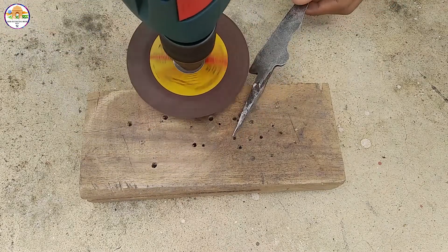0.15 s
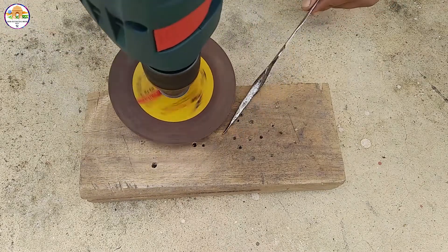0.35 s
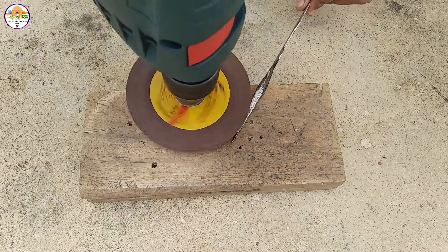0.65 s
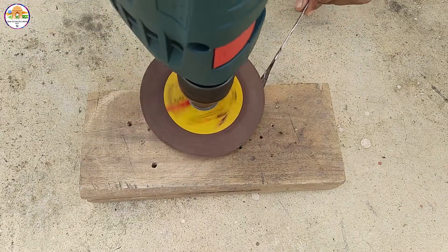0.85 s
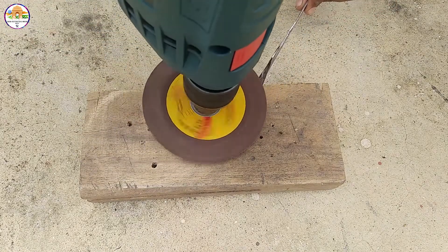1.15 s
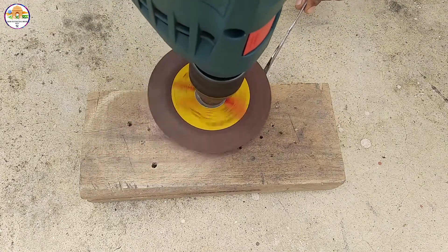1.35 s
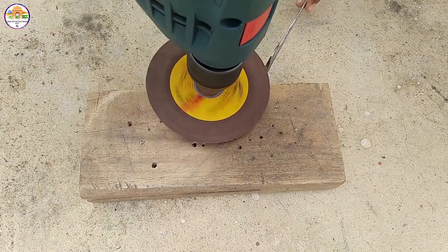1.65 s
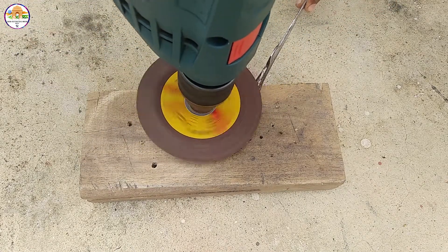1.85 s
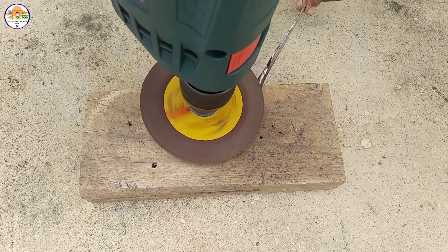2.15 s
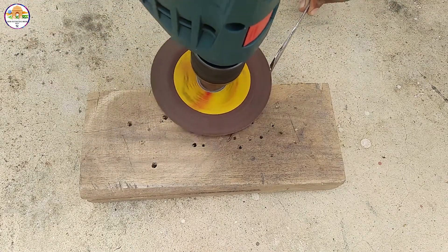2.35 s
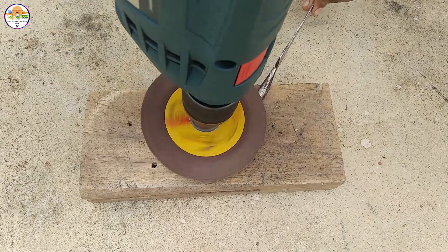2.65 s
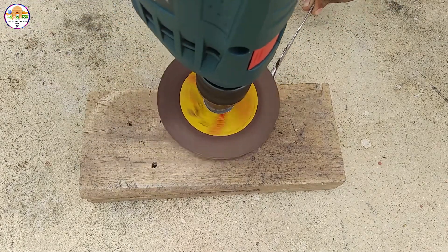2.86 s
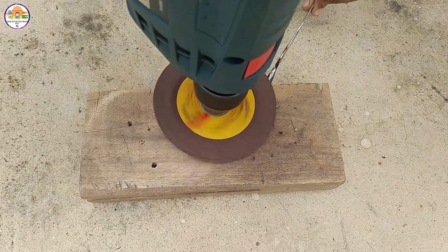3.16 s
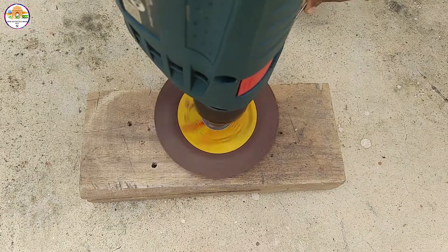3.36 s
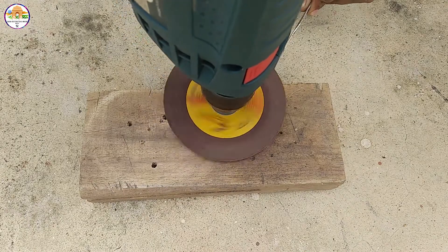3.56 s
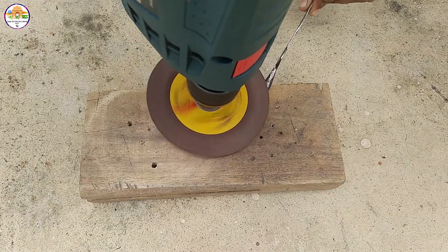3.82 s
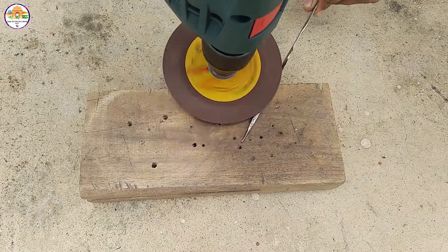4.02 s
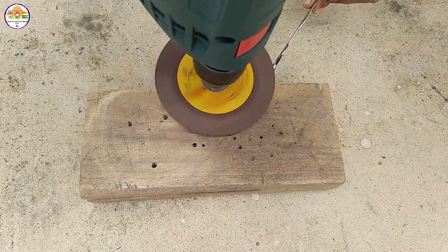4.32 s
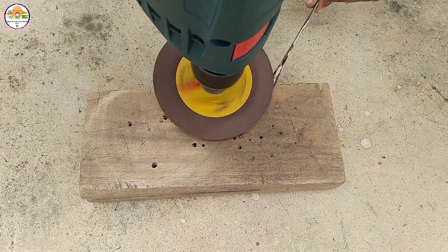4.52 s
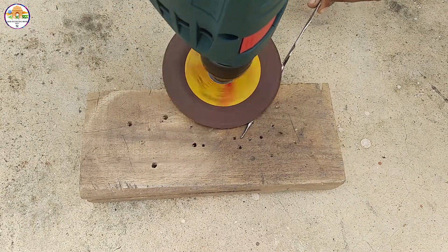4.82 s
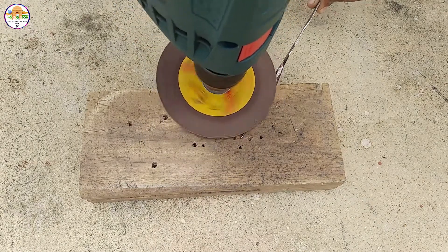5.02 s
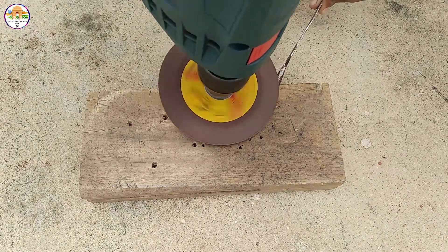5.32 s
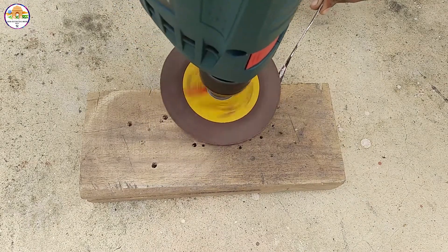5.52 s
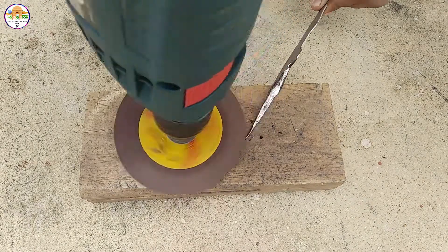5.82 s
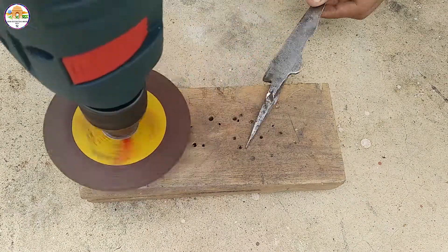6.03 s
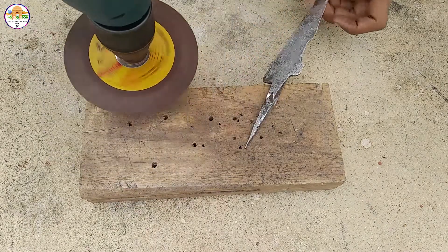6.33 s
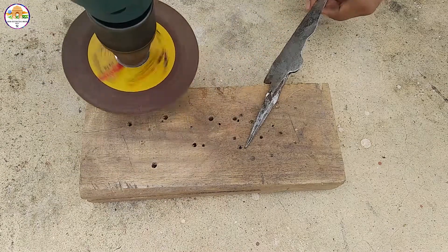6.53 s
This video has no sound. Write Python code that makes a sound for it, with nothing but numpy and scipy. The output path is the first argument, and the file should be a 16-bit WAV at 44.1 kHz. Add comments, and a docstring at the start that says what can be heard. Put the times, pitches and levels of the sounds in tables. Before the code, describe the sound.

Close, harsh disc grinding on a steel blade, a pause as the drill motor coasts down with soft thumps, then it revs up and scrapes again.

```python
"""Hand drill grinding a blade

A hand drill spins an abrasive disc against a steel blade, close to a pair of microphones. Each stroke makes
the blade ring in its bending modes (noise through resonances) over a gritty hiss (shaped noise). The trigger
is let go once: the motor's whine (a blurred tone), roar and air noise fall and climb again with its speed.
A few soft low thumps sound in the lull, over a faint low rumble."""
import sys
import numpy as np
from scipy import signal
from scipy.fft import rfft, irfft, next_fast_len
from scipy.io import wavfile
from scipy.ndimage import uniform_filter1d, map_coordinates

SR = 44100
rng = np.random.default_rng(int(sys.argv[2]) if len(sys.argv) > 2 else 0)


def wav_out(sig):
    """Save sig, one row per channel (or a flat mono array), as 16-bit PCM at SR to the path in sys.argv[1]."""
    wavfile.write(sys.argv[1], SR, np.round(np.clip(np.atleast_2d(sig).T, -1, 1) * 32767).astype(np.int16))


N = 294576
TIME = np.arange(N) / SR  # seconds

# Strokes of the disc along the blade. Each row: start in seconds, length in seconds, final blade ring in dB,
# its rise over the stroke in dB, first edge ring in dB, its fade in dB, first grit hiss in dB.
# A negative rise or fade goes the other way.
STROKES = [(-.01, 0.31, -18.5, 13.5, -18.5, 1, -20), (0.314, 0.18, -30.5, -10.5, -21, 9, -29),
           (0.485, 0.31, -22.5, 12, -18.5, 4, -22), (0.803, 0.041, -36.5, -14, -22.5, 0, -28),
           (0.853, 0.22, -21.5, 8.5, -20.5, -2, -26.5), (1.558, 0.34, -16.5, 9.5, -19.5, 6, -20),
           (1.973, 0.2, -24.5, 0, -18.5, 7.5, -21), (2.156, 0.063, -15.5, 9.5, -22.5, 4, -18.5),
           (2.24, 0.11, -17.5, -2.5, -20.5, 30, -26.5), (2.355, 0.14, -18.5, 1, -20, -3, -25.5),
           (2.493, 0.23, -17.5, -2.5, -26.5, 12, -24), (2.725, 0.14, -17.5, 2.5, -22.5, 3, -24),
           (2.867, .2, -17, -1.5, -25, 18, -21), (3.077, 0.16, -16.5, 7, -23.5, 3, -24),
           (3.247, .15, -16, 4.5, -21.5, 5, -21.5), (3.393, 0.12, -16.5, 10.5, -26.5, 5, -19.5),
           (5.3, 0.075, -31.5, 2, -40, -10, -35), (5.374, 0.065, -14, 6, -27, 0, -17.5),
           (5.486, 0.082, -18, -0.5, -37, 14, -16.5), (5.584, 0.088, -20.5, -5.5, -36.5, -15, -17.5),
           (5.679, 0.22, -19.5, 1.5, -21, 12, -16.5), (5.894, 0.23, -16, 3.5, -22.5, -0.5, -24.5),
           (6.13, .13, -17.5, 10.5, -26.5, -3.5, -21), (6.29, 0.2, -23, -4.5, -24.5, 8, -16.5),
           (6.498, 0.076, -26, -5, -24, 18, -17), (6.589, 0.15, -22, 5, -34, 3, -20)]
# Main bending modes of the blade. Each row: centre in Hz, width in Hz, relative level in dB before sharpening.
BLADE_MODES = [(1576, 53, -8.5), (1829, 97, 0), (1938.4, 71.5, 4)]
# Lower bending modes of the blade. Each row: centre in Hz, width in Hz, relative level in dB before sharpening.
LOW_BLADE_MODES = [(657, 26, -13.5), (945, 12, -17), (1224, 55, -7.5)]
# The main ring shifts as the disc travels along the blade, in three runs.
# Each row: time in seconds, ring in Hz (its ratio to 1900 Hz sets the tuning, up to 4 % either way).
RING_PITCH = [
    [(0.0, 1910), (0.066, 1780), (0.228, 1908), (0.532, 1850), (0.572, 1800), (0.628, 1910), (1.1, 1840)],
    [(1.57, 1810), (1.646, 1907), (2.356, 1913), (2.458, 1850), (2.618, 1922), (3.53, 1902)],
    [(5.37, 1875), (5.832, 1900), (5.966, 1842), (6.084, 1908), (6.68, 1906)],
]
# The lower ring shifts in its own way.
# Each row: time in seconds, ring in Hz (its ratio to 1215 Hz sets the tuning, up to 4 % either way).
LOW_RING_PITCH = [(0, 1185), (1.9, 1203), (2.3, 1245), (2.5, 1163), (2.75, 1213), (3.0, 1258), (3.5, 1265),
                  (5.4, 1226), (6.05, 1160), (6.68, 1220)]
# Ringing modes of the blade's edge. Each row: centre in Hz, width in Hz, relative level in dB.
EDGE_MODES = [(4310, 29, -9), (5160, 90, 1.5), (5530, 67, 5.5), (5730, 57, 9.5), (5905, 62, 5.5),
              (6000, 85, 6.5), (6200, 127, 6), (7470, 400, 0.5), (9350, 110, -6), (13000, 310, 0.5)]
# The edge's lower modes come and go against its upper ones as the disc travels.
# Each row: time in seconds, change of the lower modes in dB.
EDGE_BALANCE = [(0, 2), (.45, 3), (.8, 2), (1.1, 3), (1.6, 1.5), (1.8, -3), (2.15, 1), (2.4, -2), (2.8, -4),
                (3.2, -7), (3.5, -14), (5.4, -3), (5.7, 3), (6.0, 2.5), (6.3, 1.5), (6.68, 7)]
# Colour of the grit hiss. Each row: frequency in Hz, relative dB per Hz.
GRIT_COLOUR = [(1350, -38), (2300, 3), (2470, -5), (2700, -7), (3080, -7.5), (3400, -4), (4150, -5),
               (4320, -1), (4680, -6.5), (5000, -3), (5200, -2), (6080, -3), (7560, -0.5), (9240, -1.5),
               (12200, 2), (15700, -5.5)]
# Colour of the roar of gears and housing. Each row: frequency in Hz, relative dB per Hz.
HOUSING_COLOUR = [(24, -76), (40, -70), (166, -20.5), (231, -26), (367, -15), (420, -14), (629, -7),
                  (780, -7.5), (1000, 0), (1600, 2), (1850, -10), (2400, -16.5), (2560, -11.5), (3050, -7),
                  (3300, -1), (3750, -2.5), (4150, -22), (4600, -10.5), (5250, -3.5), (5750, -10.5),
                  (6500, -4.5), (7700, -18), (9000, -15), (15700, -15)]
# Colour of the cooling air. Each row: frequency in Hz, relative dB per Hz.
AIR_COLOUR = [(1470, -36), (1980, 2.5), (2200, -8), (2600, -4), (3050, -9.5), (3500, -11), (3900, -8),
              (4350, -5.5), (4650, -13), (4820, -2), (5030, -25), (5400, -1), (5620, -12), (5900, -5),
              (6780, -5.5), (7200, -6.5), (9310, 1), (10100, -0.5), (12600, 1), (15700, -6)]
# How the housing lets the rotor's low tone out. Each row: frequency in Hz, coasting level in dB.
UNBALANCE_LEVEL = [(155, -69), (210, -65), (285, -54), (385, -50), (425, -47.5), (445, -64.5), (475, -73)]
# How the housing lets the whine out. Each row: frequency in Hz, coasting level in dB.
WHINE_LEVEL = [(6000, -48), (6900, -43), (7700, -39.5), (7950, -51), (8300, -48), (8420, -27), (8950, -38),
               (9470, -22.5), (9950, -27), (10700, -28), (11600, -18.5), (12300, -24), (13300, -21),
               (14400, -28), (15100, -23), (16000, -29), (17400, -51)]
# The trigger is squeezed again. Each row: time in seconds, whine pitch in Hz.
SPIN_UP = [(5.05, 5900), (5.15, 7280), (5.2, 8130), (5.3, 9280), (5.36, 10600), (5.45, 12200), (5.5, 13500),
           (5.55, 14250), (5.62, 15300), (5.7, 15980), (6.0, 16360), (6.68, 17330)]
# Where the drill is held. Each row: time in seconds, left-minus-right level in dB with no firm contact.
DRILL_SIDE = [(0, 3), (0.7, -2.5), (1.1, -6), (3.5, -10), (4.05, -9.5), (4.4, -6.5), (5.0, -5), (5.4, -1.5),
              (6.68, 0)]
# Soft low thumps. Each row: time in seconds, peak in dB, pitch in Hz, time from peak to 1/e in seconds.
THUMPS = [(4.5, -42, 168, .008), (4.568, -41, 176, 0.014), (4.592, -40, 188, 0.0043),
          (4.646, -43, 188, 0.0051), (4.708, -33, 254, 0.0035), (4.725, -38.5, 161, 0.015),
          (4.78, -45, 210, 0.016), (4.858, -31, 233, 0.0028)]
# Colour of the low rumble. Each row: frequency in Hz, relative dB per Hz.
RUMBLE_COLOUR = [(18, -69), (30, -39), (75, -35), (110, -10), (177, -7), (400, -11.5), (520, -47),
                 (880, -120)]
# Narrow dips in the drill and grinding sound. Each row: centre in Hz, half width in Hz, depth from 0 to 1.
DIPS = [(2420, 30, 0.54), (3063, 29, 0.86), (4250, 35, 0.5), (4720, 39, 0.44), (4910, 40, 0.74)]
# How alike left and right are. Each row: frequency in Hz, likeness from 0 to 1.
ALIKE = [(30, .95), (100, 1), (300, 1), (1500, 1), (4800, 1), (5700, 0.86), (7500, 0.27), (10000, 0.58),
         (12000, 0.3), (15000, 0.1)]

TOUCH_S, LIFT_S, GRIT_LIFT_S = 0.015, 0.02, 0.055  # time to touch down; to lift off (rings, grit)
GRIT_FADE_DB = 4.5  # over a stroke
EDGE_HOLDS = 2.3  # power of the stroke's progress: the edge ring holds before it changes
EDGE_SPLIT = 4  # how many edge modes count as lower
# one extra scrape near the end of the second run of strokes
BITE_S, BITE_LENGTH_S, BITE_DB, BITE_HZ, BITE_WIDTH_HZ = 3.36, 0.11, -30, 4100, 660

WHINE_ORDER, COMMUTATOR_ORDER = 38.5, 24  # cycles for each turn of the rotor
COMMUTATOR_DB = -63
GEARING = 11  # rotor turns for each turn of the disc
# rotor speed, counted as its whine's pitch: steady, then coasting against air drag and bearing friction
RUNNING_HZ, RELEASE_S, COAST_S, FRICTION_HZ = 17400, 3.51, 2.12, 4800
POWERED_DB, UNBALANCE_POWERED_DB = 4, -3.5  # change under power: whine, low rotor tone
# noise level at running speed before the loss to the side, and the drop from there to standstill
ROAR_DB, ROAR_DROP_DB = -30.5, 14.5
AIR_DB, AIR_DROP_DB = -20.5, 36
AIR_BODY_HZ, AIR_BODY_DROP_DB = 2670, 47  # top of the air's lower band; its further drop in coasting
# noise regained at standstill while the motor pulls up to speed: air, gears, the air's lower band
STRAIN_DB, ROAR_STRAIN_DB, BODY_STRAIN_DB = 7.5, 8, 16.5
ASIDE_LOSS = 0.075  # dB of drill noise lost for each dB that it is held to the side
CENTRED = 0.87  # share by which a firm contact draws the drill's noise to the middle
FIRM_DB = -24.5  # grit level of a firm contact
RUMBLE_DB, RUMBLE_HELD_DB = -59.5, 12.5  # level; damping while the disc presses on the blade
TOP_HZ = 15760  # band limit


def grinding(ring, edge, grit):
    """Grit scrapes the steel, harder once each turn of the untrue disc; the blade's modes ring with it."""
    disc_turns = rotor_turns() / GEARING
    runout_db = 1.53 * np.sin(2 * np.pi * disc_turns + 1.17 * wobble(3.5)) + 0.91 * wobble(25)
    scrape = patchy(patchy_db=3.0) * amp(runout_db + 1.1 * wobble(300))
    push = rng.standard_normal((2, N)) * ring * amp(0.98 * runout_db + 1.63 * wobble(45))
    blade_sound = unit(blade_ring(push)) * np.sqrt(np.mean(ring ** 2))
    edge_sound = edge_ring(scrape) * edge
    grit_sound = unit(filtered(scrape, colour(GRIT_COLOUR))) * grit
    return ports(blade_sound + edge_sound + grit_sound + bite(scrape), pan_db=0)


def strokes():
    """Gains of blade ring, edge ring and grit: each contact touches down, changes along the way and lifts."""
    gains = np.zeros((3, N))
    lift = np.array([[LIFT_S], [LIFT_S], [GRIT_LIFT_S]])
    for start, length, ring_db, swell_db, edge_db, fade_db, grit_db in STROKES:
        first = max(0, int(start * SR))
        last = min(N, int((start + length + GRIT_LIFT_S + LIFT_S) * SR))
        t = np.arange(first, last) / SR - start
        done = np.clip(t / length, 0, 1)
        on = np.clip(np.minimum(t / TOUCH_S, 1 + (length - t) / lift), 0, 1)
        ring_now = ring_db - swell_db * (1 - done)
        edge_now = edge_db - fade_db * done ** EDGE_HOLDS
        grit_now = grit_db - GRIT_FADE_DB * done
        gains[:, first:last] += on * amp([ring_now, edge_now, grit_now])
    return gains


def blade_ring(push):
    """The blade's two groups of modes, each cross-faded between a low, a middle and a high tuning."""
    step = 0.04  # from one tuning to the next, as a share of the pitch
    main_shift = curves(np.vstack(RING_PITCH))[0] / 1900
    low_shift = curves(LOW_RING_PITCH)[0] / 1215
    ring = 0
    for table, shift in ((BLADE_MODES, main_shift), (LOW_BLADE_MODES, low_shift)):
        position = np.clip((shift - 1) / step, -1, 1)
        for place in (-1, 0, 1):
            share = np.clip(1 - np.abs(position - place), 0, 1)

            def tuned(hz):
                response = modes(table)(hz / (1 + place * step))
                return response * np.abs(response) ** 0.41  # sharpen the peaks

            ring = ring + filtered(push * share, tuned)
    return ring


def edge_ring(scrape):
    """The edge's modes, each coming and going on its own, in two groups of shifting balance."""
    def each_mode(hz):
        return np.array([[(-1) ** k * modes([row])(hz)] for k, row in enumerate(EDGE_MODES)])

    rings = filtered(scrape, each_mode)
    levels_db = np.array([3.15 * wobble(9) for row in EDGE_MODES])
    levels_db[:EDGE_SPLIT] += curves(EDGE_BALANCE)[0]
    return unit(np.sum(rings * amp(levels_db)[:, None], axis=0))


def bite(scrape):
    """A short extra scrape: one band of the scraping noise swells and fades."""
    done = np.clip((TIME - BITE_S) / BITE_LENGTH_S, 0, 1)
    band = unit(filtered(scrape, lambda hz: np.exp(-((hz - BITE_HZ) / BITE_WIDTH_HZ) ** 4)))
    return band * amp(BITE_DB) * np.sqrt(np.abs(np.sin(np.pi * done)))


def drill(grit):
    """Gear and housing roar, cooling air and the rotor's unbalance as a low tone; all follow its speed."""
    hz = speed()
    slowed = 1 - np.minimum(hz / RUNNING_HZ, 1)
    coasting = np.gradient(hz) < 0
    pan_db = curves(DRILL_SIDE)[0] * (1 - CENTRED * firmness(grit))

    roar_drop_db = (ROAR_DROP_DB - ROAR_STRAIN_DB * ~coasting) * slowed
    roar = unit(filtered(patchy(patchy_db=3.5), colour(HOUSING_COLOUR)))
    roar = roar * amp(ROAR_DB - roar_drop_db + 0.087 * wobble(27))
    noise = (roar + cooling_air(slowed, coasting)) * amp(-ASIDE_LOSS * np.abs(pan_db))

    level_db = 2.5 * wobble(14) + UNBALANCE_POWERED_DB * ~coasting
    turning = np.sin(2 * np.pi * rotor_turns() + 0.5 * wobble(30))
    unbalance = colour(UNBALANCE_LEVEL)(hz / WHINE_ORDER) * amp(level_db) * turning
    return ports(noise, pan_db, spread=0.037) + unbalance * amp([[-1.5], [1.5]])


def cooling_air(slowed, coasting):
    """Air hiss in two bands; the lower one falls away faster as the rotor coasts down."""
    def two_bands(hz):
        low = 1 / (1 + (hz / AIR_BODY_HZ) ** 8)
        return colour(AIR_COLOUR)(hz) * np.array([[low], [1 - low]])

    body, hiss = filtered(patchy(patchy_db=4.0), two_bands)
    body_gain = amp(np.where(coasting, -AIR_BODY_DROP_DB, BODY_STRAIN_DB) * slowed)
    drop_db = (AIR_DROP_DB - STRAIN_DB * ~coasting) * slowed
    air = (body * body_gain + hiss) / np.std(body + hiss)
    return air * amp(AIR_DB - drop_db + 1.36 * wobble(55))


def whine():
    """A high rotor order, blurred by uneven contacts and throbbing once each turn of the disc."""
    hz = speed()
    coasting = np.gradient(hz) < 0
    phase = 2 * np.pi * WHINE_ORDER * rotor_turns()

    def blur(rate):
        return np.array([wobble(rate) + 1j * wobble(rate) + 1.0 for port in "LR"])

    throb = amp(4.1 * np.cos(2 * np.pi * (rotor_turns() / GEARING + 0.25)))
    blurred = np.where(coasting, blur(190), blur(700)) * np.exp(1j * phase)
    tone = unit(throb * np.real(blurred))
    octave_on = coasting * (hz < SR / 5) * (hz > 6500)
    octave = amp(-51) * octave_on * np.real(blur(300) * np.exp(2j * phase))
    lower_phase = phase * COMMUTATOR_ORDER / WHINE_ORDER
    lower = amp(COMMUTATOR_DB) * coasting * np.real(blur(120) * np.exp(1j * lower_phase))

    level = colour(WHINE_LEVEL)(hz)
    # under power the pitch sweeps too fast to show the housing's dips
    smooth_level = amp(POWERED_DB) * uniform_filter1d(level, size=SR // 12)
    level = np.where(coasting, level, smooth_level)
    pan = amp(np.array([[.5], [-.5]]) * 1.03 * curves(DRILL_SIDE)[0])
    return (level * tone + octave + lower) * pan


def speed():
    """Rotor speed as whine pitch in Hz: drag and friction slow it after release, then power lifts it."""
    since_release = np.maximum(TIME - RELEASE_S, 0)
    coasting = (RUNNING_HZ + FRICTION_HZ) * np.exp(-since_release / COAST_S) - FRICTION_HZ
    return np.where(TIME < SPIN_UP[0][0], coasting, curves(SPIN_UP)[0])


def rotor_turns():
    """Turns of the rotor so far: its speed added up over time."""
    return np.cumsum(speed()) / WHINE_ORDER / SR


def thumps():
    """Soft low pushes: short low tones that swell and die away smoothly."""
    out = np.zeros(N)
    for start, db, hz, length in THUMPS:
        t = TIME - start
        out += amp(db) * np.cos(2 * np.pi * hz * t) * np.exp(-(t / length) ** 2)
    return out * amp([[-1.5], [1.5]])


def rumble(grit):
    """A faint low rumble of shaped noise, weaker while the disc is pressed on the blade."""
    level = amp(RUMBLE_DB - RUMBLE_HELD_DB * firmness(grit) + 1.9 * wobble(9))
    noise = unit(filtered(patchy(patchy_db=4.0), colour(RUMBLE_COLOUR)))
    return ports(noise * level, pan_db=-6.0, spread=0.05)


def firmness(grit):
    """How firmly the disc presses on the blade, from 0 to 1, judged by the grit gain."""
    return np.clip(grit / amp(FIRM_DB), 0, 1)


def dips(hz):
    """The gain left by the narrow dips."""
    return np.prod([1 - depth / (1 + ((hz - c) / w) ** 2) for c, w, depth in DIPS], axis=0)


def ports(pair, pan_db, spread=0):
    """Two noises to left and right: most alike in the bass, less in the treble and when off to one side."""
    f, alike = np.transpose(ALIKE)

    def mid_side(hz):
        likeness = np.clip(np.interp(np.log(hz + 1), np.log(f), alike), 0, 1)
        turn = np.arccos(likeness) / 2
        return np.array([np.cos(turn), np.sin(turn)])

    mid, side = filtered(pair, mid_side)
    side = side + spread * np.abs(pan_db) * pair[1]
    return np.array([mid + side, mid - side]) * amp(np.array([[.5], [-.5]]) * pan_db)


def patchy(patchy_db):
    """Two noises whose strength varies in patches of time and frequency."""
    z = signal.stft(rng.standard_normal((2, N)), nperseg=512)[2]
    field = uniform_filter1d(rng.standard_normal(z.shape[1:]), 3, 0)  # smooth over frequency
    field = uniform_filter1d(field, 12, 1)  # smooth over time
    return signal.istft(z * amp(patchy_db * unit(field)), nperseg=512)[1][:, :N]


def modes(table):
    """The response of a set of resonances, with alternating signs."""
    def response(f):
        total = 0
        for k, (centre, width, db) in enumerate(table):
            damping = 1j * f * width
            total = total + (-1) ** k * amp(db) * damping / (centre * centre - f * f + damping)
        return total
    return response


def colour(points):
    """The gain of (Hz, dB) points read on a log axis."""
    f, db = np.transpose(points)
    return lambda hz: amp(np.interp(np.log(hz + 1), np.log(f + 1), db))


def filtered(x, response):
    """x times a complex response of frequency."""
    m = next_fast_len(N + SR // 2)  # padded with silence
    return irfft(rfft(x, m) * response(np.fft.rfftfreq(m, 1 / SR)), m)[..., :N]


def wobble(rate):
    """A smooth random curve, rate knots a second."""
    knots = rng.standard_normal(int(N * rate / SR) + 4)
    return map_coordinates(knots, [np.arange(N) * rate / SR])


def curves(rows):
    """One value per sample for each column after the time."""
    s, *cols = np.transpose(rows)
    return [np.interp(TIME, s, c) for c in cols]


def amp(db):
    """Decibels to a plain gain."""
    return 10 ** (np.asarray(db) / 20)


def unit(x):
    """x scaled to an average (rms) strength of 1."""
    return x / np.sqrt(np.mean(x ** 2) + 1e-20)


def scene():
    """Grinding and drill share the dips; whine, thumps and rumble are added on top."""
    contact = strokes()
    grit = contact[2]
    working = filtered(drill(grit) + grinding(*contact), dips)
    return working + whine() + thumps() + rumble(grit)


def record(dry):
    """The microphones round off the peaks, drop the deep bass and keep nothing above the band limit."""
    soft = dry / (1 + np.abs(dry / 0.97) ** 4) ** (1 / 4)
    return filtered(soft, lambda hz: (1j * hz / (70 + 1j * hz)) ** 3 * (hz < TOP_HZ))


dry = scene()
out = record(dry)
wav_out(out)
```